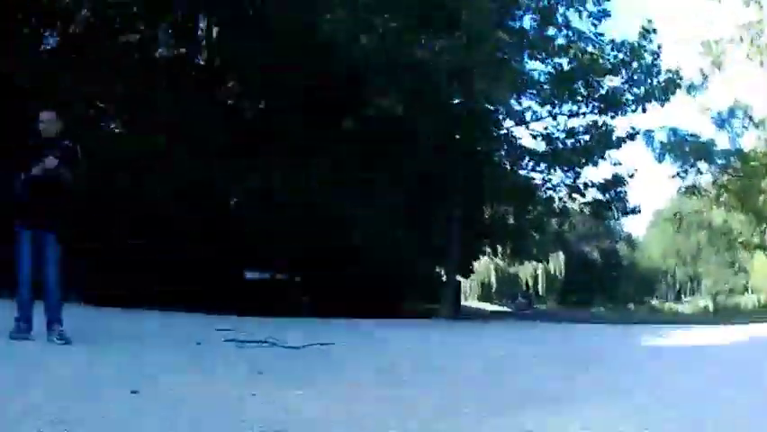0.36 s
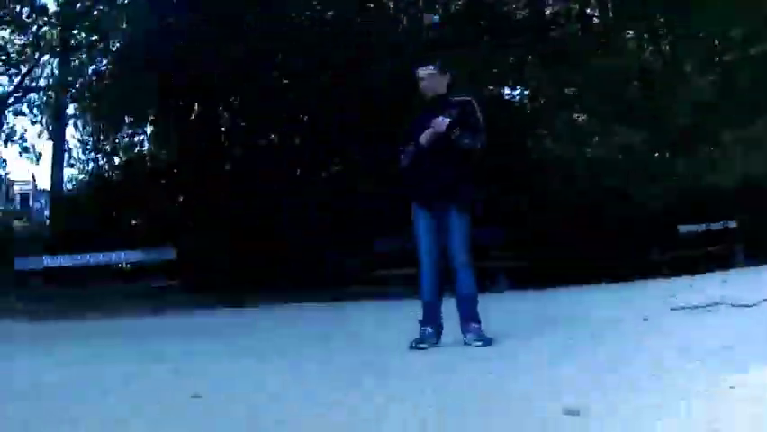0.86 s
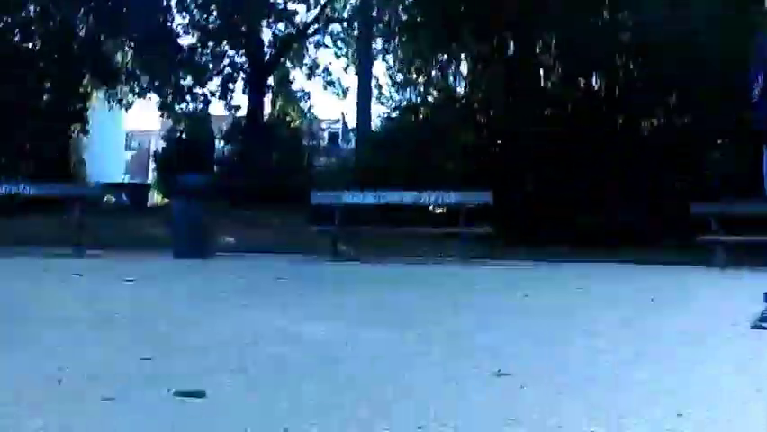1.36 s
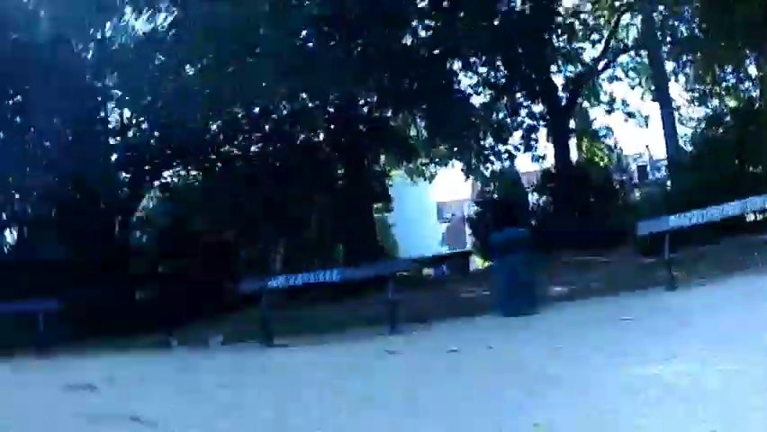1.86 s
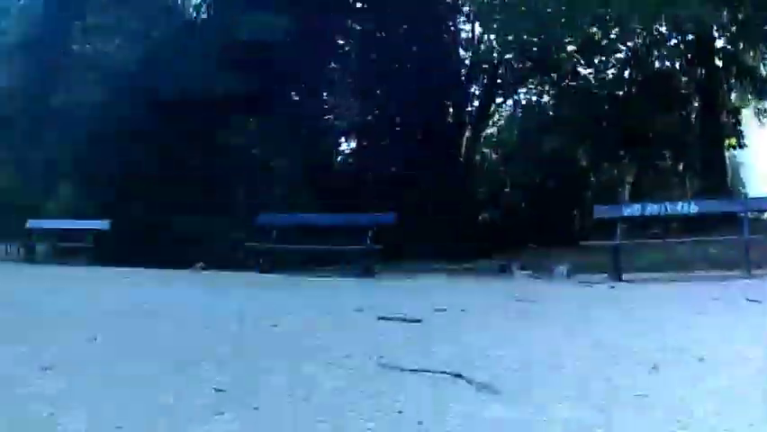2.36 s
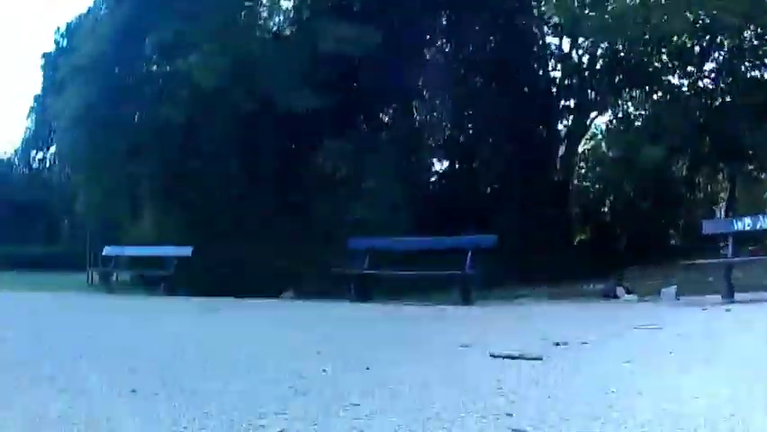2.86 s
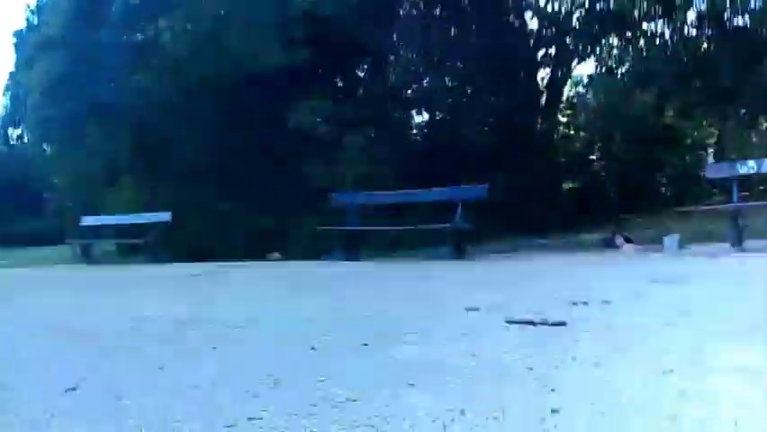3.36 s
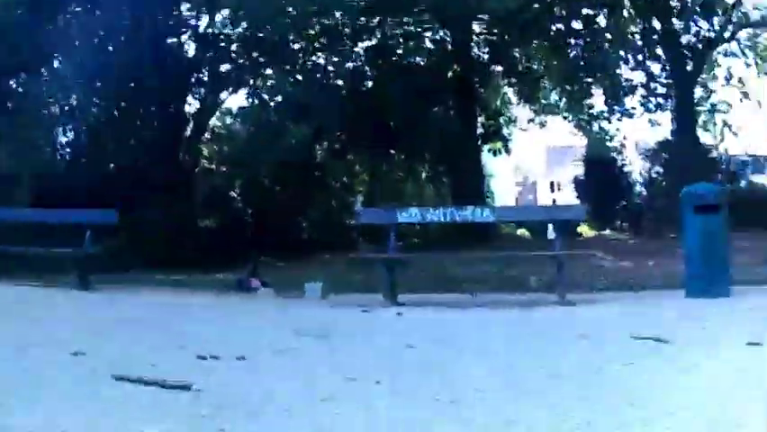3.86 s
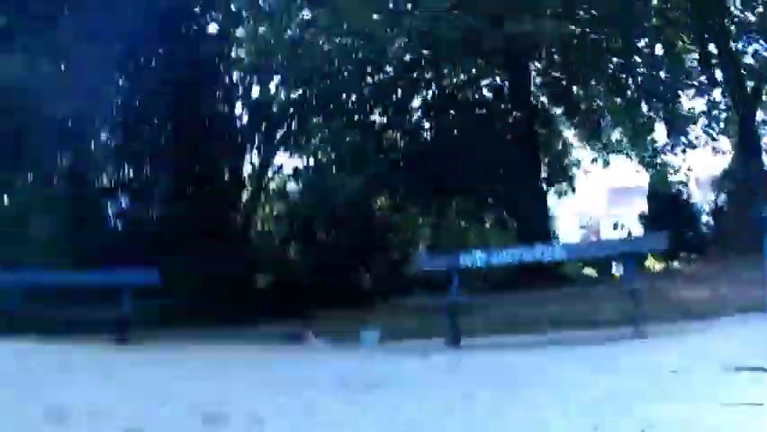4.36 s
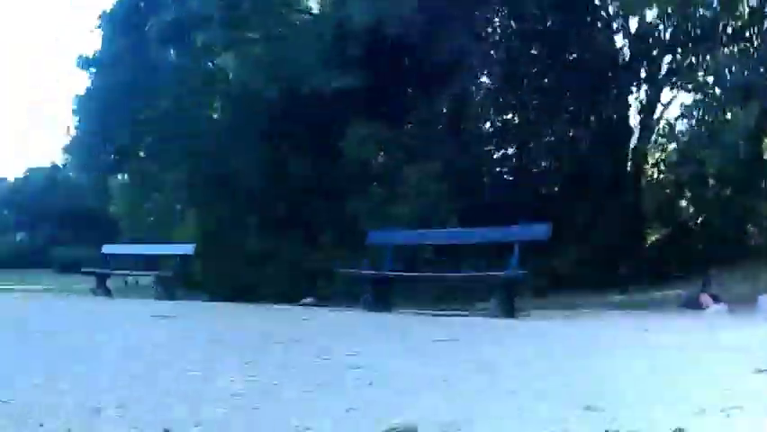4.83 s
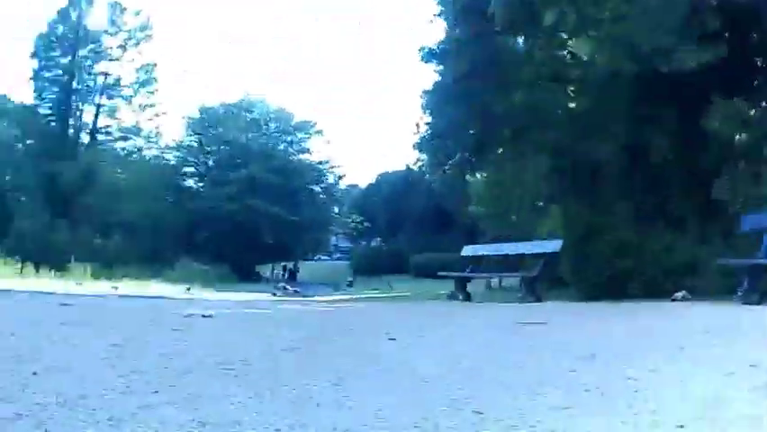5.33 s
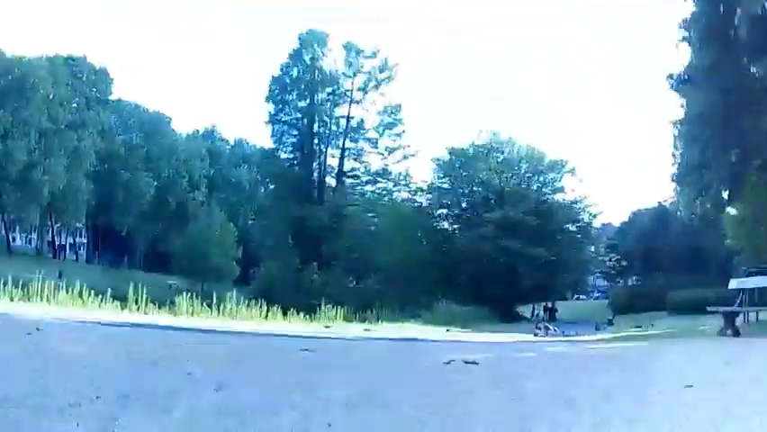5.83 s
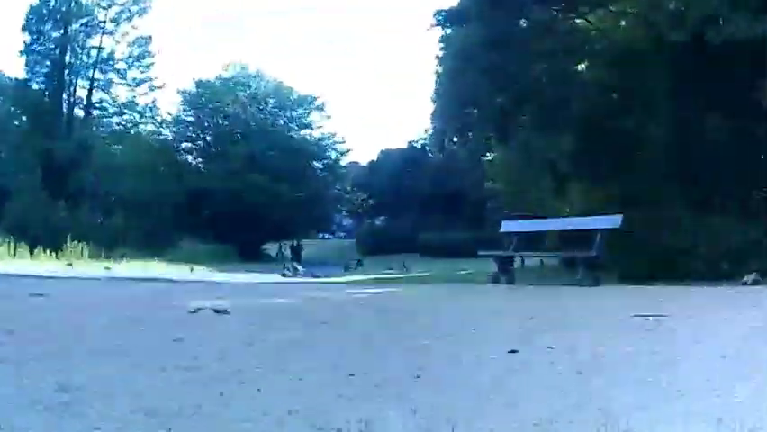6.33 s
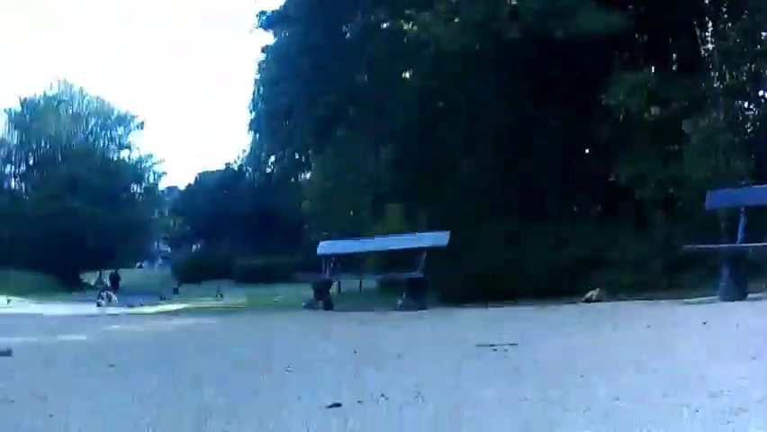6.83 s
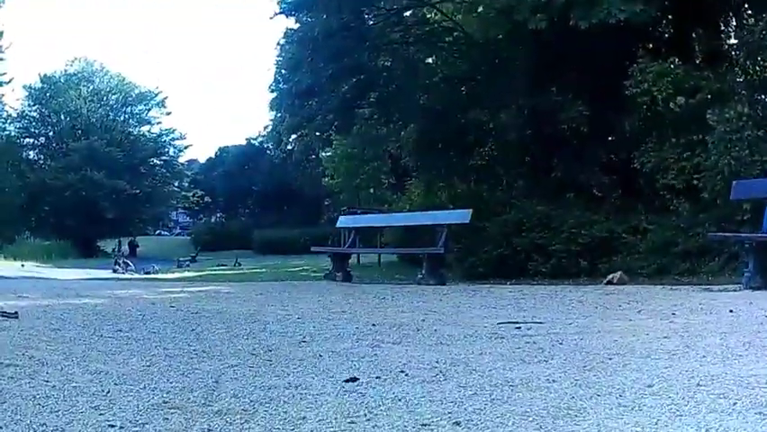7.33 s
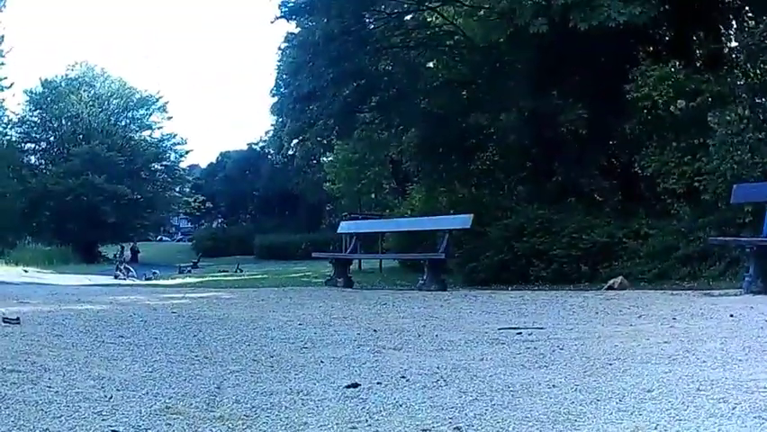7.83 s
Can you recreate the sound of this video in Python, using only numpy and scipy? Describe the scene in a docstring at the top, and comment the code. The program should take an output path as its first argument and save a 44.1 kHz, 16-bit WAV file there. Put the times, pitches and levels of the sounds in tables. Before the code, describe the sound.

Close, boxy gear whine wavers over crunching grit and plastic rattles, dips briefly midway, then halts, leaving settling clicks and near silence.

```python
"""Toy car on coarse sand

A small electric toy car carries a camera in a closed case over coarse sand, brakes, backs up, drives on and stops.
The chassis carries a wavering gear whine (swept sines), grit grinding under the wheels (clumped, filtered noise)
and the case rattling in its mount (noise bursts and resonances). The body then settles with a few ticks (short
ringing noise) over faint, muffled park air (filtered noise) with paired electric ticks.
"""
import sys
import numpy as np
from scipy import signal
from scipy.fft import rfft, irfft, next_fast_len
from scipy.io import wavfile
from scipy.ndimage import uniform_filter1d, map_coordinates

SR = 44100
rng = np.random.default_rng(int(sys.argv[2]) if len(sys.argv) > 2 else 0)


def voltage_ratio(level):
    """Linear amplitude factor for a level in decibels (scalar or array-like)."""
    return 10 ** (np.asarray(level, float) / 20)


def dump_mix(stems):
    """Bounce the given channels to the path in sys.argv[1] as a 16-bit WAV at rate SR."""
    frames = np.atleast_2d(stems).T  # one column per channel
    limited = np.clip(frames, -1, 1)  # hard clip at full scale
    pcm = np.round(limited * 32767).astype(np.int16)
    wavfile.write(sys.argv[1], SR, pcm)


N = 361619  # samples

# Rolling. Each row: time in seconds, relative grind level in dB, slack mesh pitch in Hz,
# relative slack whine level in dB.
ROLLING = [(0, -25.5, 1342, -24), (2.51, -26, 1354, -30.5), (2.525, -33.5, 1343, -45),
           (2.55, -26.5, 1348, -51), (2.72, -30, 1330, -35), (2.85, -35, 1301, -50),
           (2.865, -26, 1077, -31.5), (3.5, -26.5, 1137, -28.5), (4.3, -24.5, 1200, -29),
           (5.2, -27, 1165, -29), (5.45, -24.5, 1307, -27), (6.55, -27, 1354, -26),
           (6.63, -29.5, 1370, -40), (6.92, -36, 1406, -38), (7.03, -46, 1440, -64),
           (7.17, -54.5, 1460, -75), (7.7, -65, 1430, -92)]
# Turns of an uneven wheel that bumps once a turn. Each row: time in seconds, turns done.
WHEEL_TURNS = [(0, -1), (1.96, 15), (3.75, 27), (4.57, 32), (5.11, 36), (5.42, 38), (6.56, 46), (7.1, 48)]
# What the chassis and case let through. Each row: frequency in Hz, relative level in dB.
CHASSIS_SPECTRUM = [(300, -41), (725, -21.5), (1150, -2.5), (1450, 3.5), (1750, -8.5), (2120, -1),
                    (2570, -10.5), (2920, -8), (4200, -27), (5400, -39), (6100, -64.5)]
# What a knock on the case sends inside. Each row: frequency in Hz, relative level in dB.
KNOCK_SPECTRUM = [(500, -25), (1300, 5), (3000, -3), (5200, -23), (6300, -72.5)]
# Two chassis modes left ringing at a crawl. Each row: frequency in Hz, width in Hz, relative level in dB.
CRAWL_MODES = [(1480, 490, -4), (2130, 130, -7)]


def unit(x):
    """Scale to rms 1."""
    return x / np.sqrt(np.mean(x ** 2) + 1e-20)


def curves(rows):
    """One value per sample for each column after the time."""
    time_s, *columns = np.transpose(rows)
    return [np.interp(np.arange(N) / SR, time_s, column) for column in columns]


def wobble(knots_per_s):
    """A smooth random curve through normal random knots."""
    return map_coordinates(rng.standard_normal(N // 20), [np.arange(N) * knots_per_s / SR])


def coloured(x, spectrum):
    """x through the causal minimum-phase filter whose gain follows the (Hz, dB) points."""
    size = next_fast_len(N + 8192, True)
    hz, db = np.transpose(spectrum)
    log_hz = np.log(np.fft.rfftfreq(size, 1 / SR) + 1)
    gain = voltage_ratio(np.interp(log_hz, np.log(hz + 1), db))
    # folding the cepstrum makes the filter causal
    cepstrum = irfft(np.log(gain), size)
    cepstrum[1:size // 2] *= 2
    cepstrum[size // 2 + 1:] = 0
    return irfft(rfft(x, size) * np.exp(rfft(cepstrum)), size)[:N]


def ringing(x, modes):
    """x through a sum of resonances (centre Hz, width Hz, peak gain dB)."""
    size = next_fast_len(N + 8192, True)
    f = np.fft.rfftfreq(size, 1 / SR)
    gain = sum(voltage_ratio(db) * 1j * f * w / (c * c - f * f + 1j * f * w) for c, w, db in modes)
    return irfft(rfft(x, size) * gain, size)[:N]


def bursts(times_s, sizes, t60_s):
    """Envelope of contacts that start sharply and fall at 60 dB per t60_s, cut off after 50 ms."""
    at = np.clip(np.round(np.ravel(times_s) * SR).astype(int), 0, N - 1)
    tail = voltage_ratio(-60 * np.arange(SR // 20) / SR / t60_s)
    hits = np.bincount(at, np.ravel(sizes), N)
    return np.abs(signal.fftconvolve(hits, tail)[:N])


def peak_one(x, spectrum):
    """x coloured so that a single impulse peaks at 1."""
    return coloured(x, spectrum) / np.abs(coloured(np.arange(N) == 0, spectrum)).max()


def gears():
    """Mesh tone and octave: pitch swings once a wheel turn, swells at a chassis mode, bites under load."""
    # Loudest bites under load. Each row: time in seconds, mesh pitch in Hz, relative peak level in dB.
    bites = [(0.14, 1496, -9), (0.324, 1453, -10), (0.694, 1453, -15.5), (0.951, 1496, -12),
             (1.253, 1206, -18), (1.441, 1410, -15.5), (1.552, 1431, -13.5), (1.677, 1453, -13),
             (1.812, 1442, -13), (2.084, 1410, -14), (2.271, 1335, -14), (2.325, 1453, -14),
             (2.352, 1421, -10), (2.385, 1410, -8), (2.474, 1421, -7.5), (2.505, 1431, -11),
             (2.648, 1496, -19), (2.871, 1302, -16), (3.559, 1399, -11.5), (4.406, 1345, -16),
             (5.199, 1399, -14), (5.345, 1496, -13), (5.715, 1388, -8.5), (5.859, 1410, -11),
             (5.953, 1464, -12.5), (6.103, 1399, -13.5), (6.298, 1442, -16), (6.437, 1399, -14),
             (6.554, 1464, -15.5)]
    swing_share, lead_turns = .085, .33  # pitch peaks lead_turns ahead of each bump
    swell_hz, swell_width_hz, swell_peak_db = 1473, 70, 4.5
    bite_pitch_s, bite_level_s = .02, .007

    _, slack_hz, slack_db = curves(ROLLING)
    t = np.arange(N) / SR
    swing = swing_share * np.cos(2 * np.pi * (curves(WHEEL_TURNS)[0] + lead_turns))
    hz = slack_hz * (1 + swing + 0.03086 * np.tanh(wobble(35)))
    swell_db = swell_peak_db * np.exp(-((hz - swell_hz) / swell_width_hz) ** 2)
    flutter_db = 5.3 * np.tanh(wobble(28)) + 3.5 * np.tanh(wobble(90))
    level = voltage_ratio(slack_db + swell_db + flutter_db)

    for s, bite_hz, db in bites:
        near = slice(round((s - .07) * SR), round((s + .07) * SR))
        hz[near] += np.exp(-((t[near] - s) / bite_pitch_s) ** 2) * (bite_hz - hz[near])
        level[near] += np.exp(-((t[near] - s) / bite_level_s) ** 2) * (voltage_ratio(db) - level[near])

    tremble = 0.012 * wobble(70) + 0.02265 * wobble(250)
    cycles = np.cumsum(hz * (1 + tremble)) / SR
    # the octave stands out where it meets a chassis resonance
    octave_db = -16 + 11 * np.exp(-((2 * hz - 2130) / 220) ** 2) + 4 * wobble(30)
    tone = np.sin(2 * np.pi * cycles) + voltage_ratio(octave_db) * np.sin(4 * np.pi * cycles)
    return level * voltage_ratio(3.9 * np.tanh(wobble(110))) * tone


def wheels():
    """Grit crushed under the tyres shakes the chassis in clumps, over a low tyre rumble."""
    # Tyre rumble. Each row: frequency in Hz, relative level in dB.
    rumble_spectrum = [(15, -22), (25, -5), (130, -6), (700, -7.5), (1000, -13), (2000, -65)]

    grind_db = curves(ROLLING)[0]
    draws = rng.random((14000, 2))
    grain_sizes = voltage_ratio(-3.5 * np.log(draws[:, 1] + 0.016))
    grit = bursts(draws[:, 0] * N / SR, grain_sizes, t60_s=0.0038)
    clumps = voltage_ratio(0.83 * wobble(11) + 1.38 * wobble(45))
    shake = clumps * (1.2 + unit(grit)) * rng.standard_normal(N)

    # the grinding is uneven: random patches of more and less gain over time and frequency
    z = signal.stft(shake, nperseg=256)[2]
    patches = uniform_filter1d(rng.standard_normal(z.shape), 2, 0)
    patches = uniform_filter1d(patches, 8, 1)
    shake = signal.istft(z * voltage_ratio(2.88 * unit(patches)), nperseg=256)[1][:N]

    rumble_level = voltage_ratio(4.2 * wobble(7.4) + 0.28 * wobble(15))
    rumble = rumble_level * coloured(rng.standard_normal(N), rumble_spectrum)

    # as the car slows the broad grind gives way to two ringing modes
    slow = np.clip((-26.5 - grind_db) / 6, 0, .5)
    broad = unit(coloured(shake, CHASSIS_SPECTRUM))
    crawl = unit(ringing(coloured(shake, KNOCK_SPECTRUM), CRAWL_MODES))
    grind = (1 - slow) * broad + slow * crawl
    return voltage_ratio(grind_db + 2.5) * grind + voltage_ratio(0.91 * grind_db - 22) * unit(rumble)


def case():
    """Jolts clack amid weaker chatter and scrape: listed, once a wheel turn, and random; plus lone grit ticks."""
    # Hardest rattles of the case in its mount. Each row: time in seconds, relative treble level in dB.
    hard_jolts = [(0.245, -48), (0.337, -52.5), (0.515, -53), (0.738, -55.5), (1.365, -53), (1.471, -53.5),
                  (1.573, -58), (1.696, -50), (1.887, -53.5), (1.954, -50.5), (2.548, -54.5), (2.68, -57),
                  (2.71, -48.5), (2.782, -55), (2.815, -57.5), (2.995, -56), (3.167, -56), (3.283, -48.5),
                  (3.449, -56), (3.922, -48.5), (4.082, -53.5), (4.158, -53.5), (5.111, -52),
                  (5.421, -46.5), (5.596, -46.5), (5.693, -49), (5.824, -49), (5.91, -52), (5.99, -49.5),
                  (6.106, -49.5)]
    # Plastic on plastic, top end. Each row: frequency in Hz, relative level in dB.
    clack_spectrum = [(3410, -32), (5800, -9.5), (6050, -15), (6520, -2.5), (7290, -7), (8020, -37.5),
                      (8710, -7), (11600, 4), (12300, -1.5), (15600, -19)]
    # Low modes of the mount. Each row: frequency in Hz, width in Hz, relative level in dB.
    mount_modes = [(228, 43, 2), (452.6, 106, 4)]
    bump_mean_db, bump_range_db, bump_scatter_s = -56.5, 10.5, .015  # relative level; scatter is +-
    chatter_reach_s, chatter_scatter_s = 1 / 59.62, .006  # reach each side of a jolt; total scatter
    tick_top_db, tick_range_db = -52, 11
    rolling_s = 6.6

    grind_db = curves(ROLLING)[0]
    small = rng.random((30, 2))
    small_jolts = np.c_[rolling_s * small[:, 0], -74 + 15 * small[:, 1]]

    turn_s, turns_done = np.transpose(WHEEL_TURNS)
    bump = rng.random((47, 2))
    bump_s = np.interp(np.arange(len(bump)), turns_done, turn_s)
    bump_s = bump_s + bump_scatter_s * (2 * bump[:, 0] - 1)
    bumps = np.c_[bump_s, bump_mean_db + bump_range_db * (bump[:, 1] - .5)]

    # four weaker contacts around each jolt
    s, db = np.r_[bumps, small_jolts, hard_jolts].T[..., None]
    draws = rng.random((len(s), 2, 4))
    offsets_s = np.array([-1, -.5, .5, 1]) * chatter_reach_s + chatter_scatter_s * (draws[:, 0] - .5)
    times_s = np.c_[s, s + offsets_s]
    sizes = np.c_[voltage_ratio(db), voltage_ratio(db - 22 * draws[:, 1])]

    lone = rng.random((80, 2))
    lone_s = (np.arange(len(lone)) + lone[:, 0]) * rolling_s / len(lone)
    times_s = np.r_[times_s.ravel(), lone_s]
    sizes = np.r_[sizes.ravel(), voltage_ratio(tick_top_db - tick_range_db * lone[:, 1])]

    clacks = bursts(times_s, sizes, t60_s=0.0039)
    scrape = uniform_filter1d(clacks, size=500)
    noise = rng.standard_normal((3, N))
    top = (voltage_ratio(8.5) * clacks + voltage_ratio(10.5) * scrape + voltage_ratio(2 * grind_db - 31)) * noise[0]
    top = coloured(top, clack_spectrum) / np.std(coloured(noise[0], clack_spectrum))
    knock = coloured(bursts(times_s, sizes, t60_s=0.019) * noise[1], KNOCK_SPECTRUM)
    knock = voltage_ratio(35) * knock / np.std(coloured(noise[1], KNOCK_SPECTRUM))
    return top + knock + voltage_ratio(30.5) * ringing(clacks * (1 + noise[2]), mount_modes)


def settling():
    """Ticks of the body settling on its springs as the car stops, each with a ragged, weaker ring."""
    # Settling ticks. Each row: time in seconds, relative peak level in dB.
    settle_ticks = [(6.942, -24), (7.068, -43), (7.152, -46.5), (7.232, -42), (7.331, -38.5), (7.415, -41),
                    (7.422, -28.5), (7.427, -30), (7.795, -50)]
    # Hollow modes of the body shell. Each row: frequency in Hz, width in Hz, relative level in dB.
    shell_modes = [(450, 86, -2), (890, 38, -2)]

    s, db = np.transpose(settle_ticks)
    shape = bursts(s, voltage_ratio(db), t60_s=0.011) + voltage_ratio(-18.5) * bursts(s, voltage_ratio(db), t60_s=0.12)
    tick = uniform_filter1d(shape, size=130) * rng.standard_normal(N)
    dull = peak_one(tick, KNOCK_SPECTRUM)
    direct = voltage_ratio(-10.0) * peak_one(tick, CHASSIS_SPECTRUM)
    return direct + voltage_ratio(-5) * ringing(dull, CRAWL_MODES) + voltage_ratio(7.5) * ringing(dull, shell_modes)


def park():
    """Muffled far air and leaves as filtered noise; faint electric ticks in pairs, twenty pairs a second."""
    # Park air inside the case. Each row: frequency in Hz, relative level in dB.
    air_spectrum = [(15, -24.5), (25, 8.5), (113, -3), (554, -11), (1090, -5.5), (1380, 1), (2870, -5),
                    (4070, -20.5), (4910, -27.5), (5780, -45.5), (15600, -36)]

    air = voltage_ratio(-59.5 + .6 * wobble(2.2)) * unit(coloured(rng.standard_normal(N), air_spectrum))
    first_s = .027 + np.arange(164) / 20
    pairs_s = np.r_[first_s, first_s + .017]
    ticks = bursts(pairs_s, np.ones(len(pairs_s)), t60_s=.004) * rng.standard_normal(N)
    # the same resonance twice, for steeper skirts
    ticks = ringing(ringing(ticks, [(4300, 580, 0.0011)]), [(4300, 580, 0.0059)])
    return air + voltage_ratio(-49.5) * ticks


def scene():
    """All sources sum at one microphone."""
    return (gears() + wheels() + case() + settling() + park())[None]


def band_limit(x):
    """A steep low-pass at the top of the band."""
    return signal.sosfilt(signal.butter(12, 15800, fs=SR, output="sos"), x)


def record(dry):
    """Take the microphone mix at its own level."""
    return band_limit(dry)


dry = scene()
out = record(dry)
dump_mix(out)
```